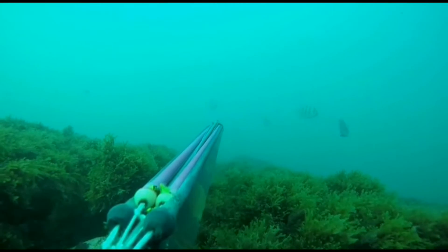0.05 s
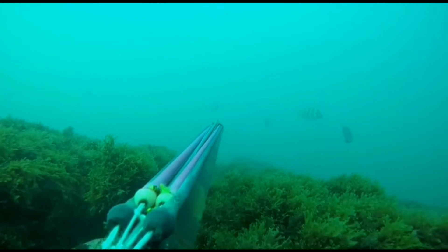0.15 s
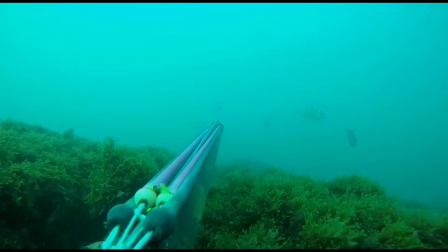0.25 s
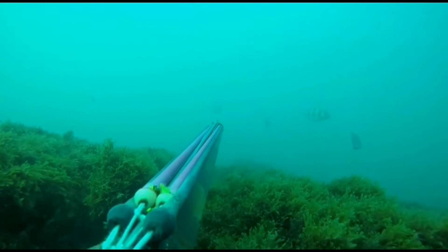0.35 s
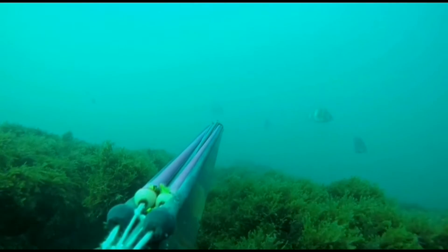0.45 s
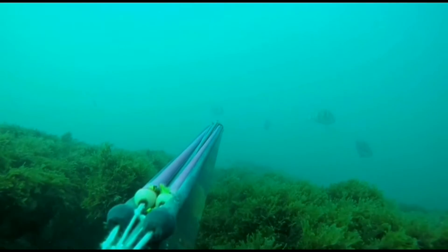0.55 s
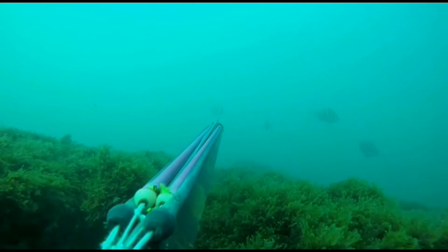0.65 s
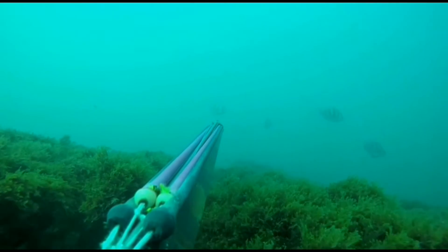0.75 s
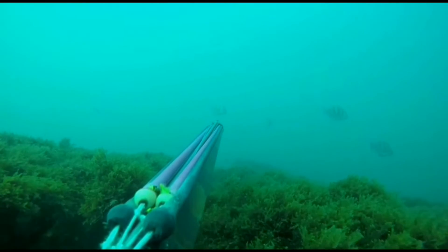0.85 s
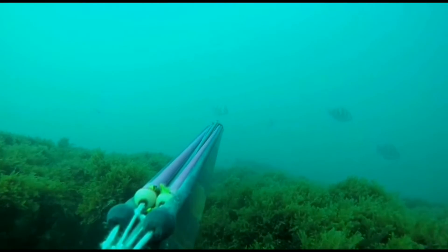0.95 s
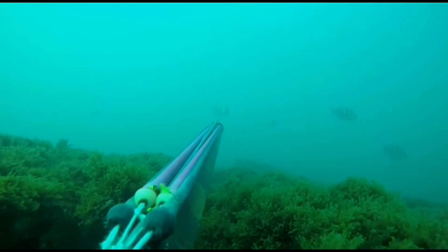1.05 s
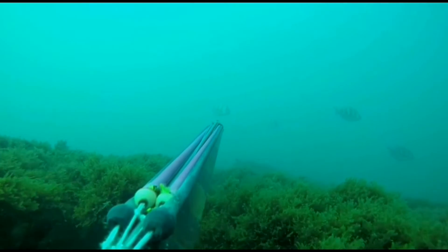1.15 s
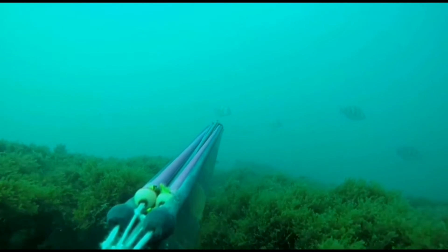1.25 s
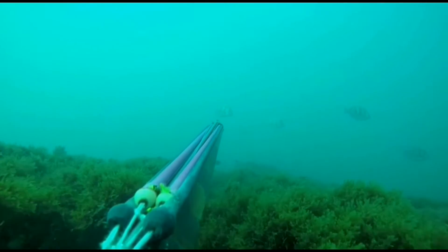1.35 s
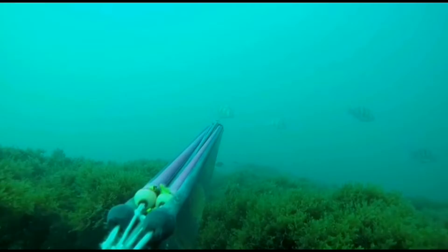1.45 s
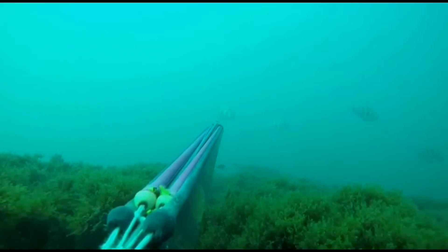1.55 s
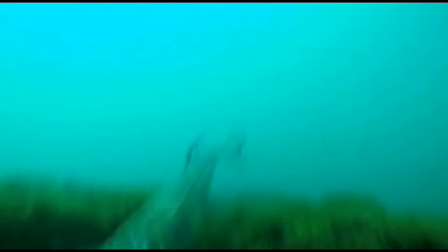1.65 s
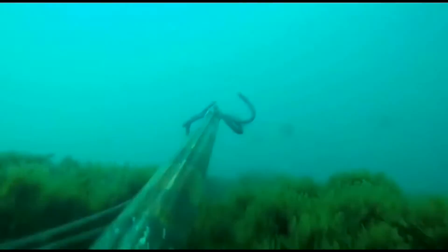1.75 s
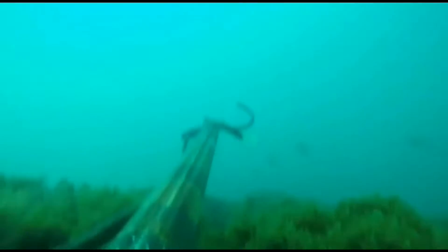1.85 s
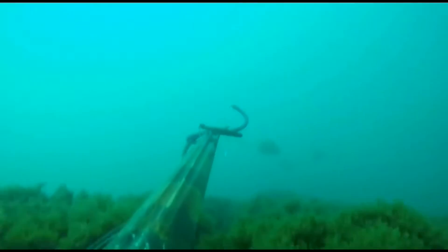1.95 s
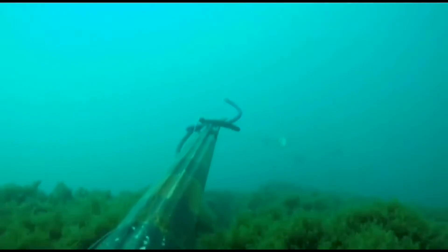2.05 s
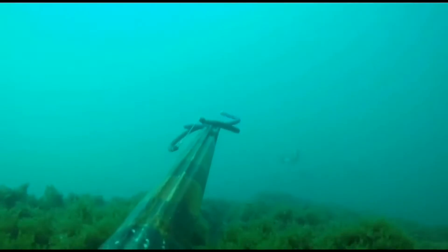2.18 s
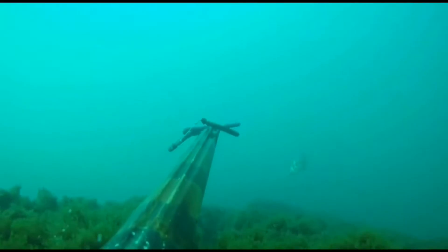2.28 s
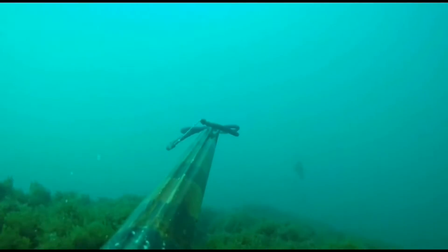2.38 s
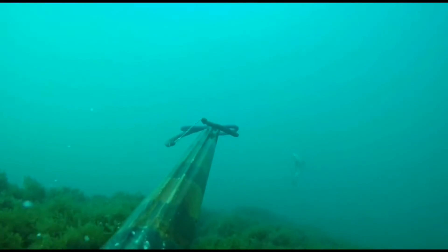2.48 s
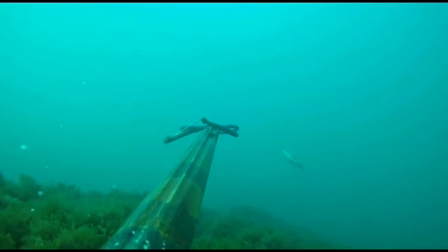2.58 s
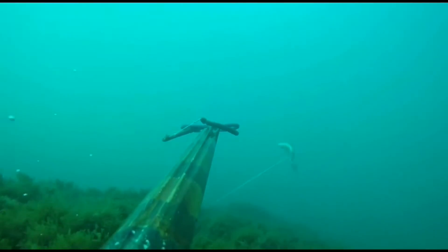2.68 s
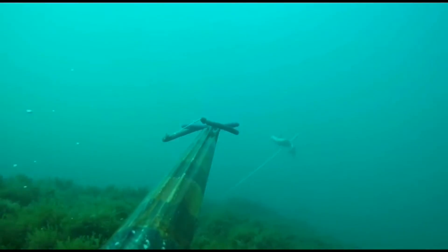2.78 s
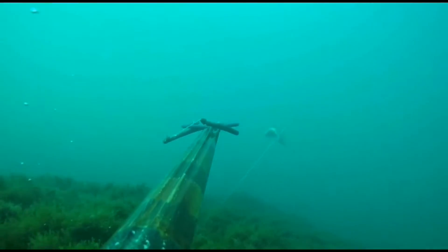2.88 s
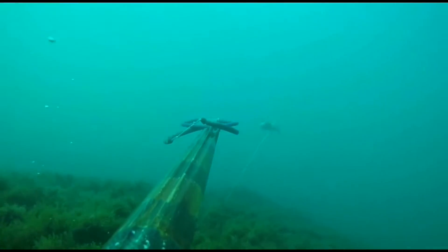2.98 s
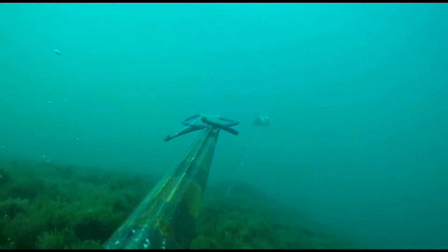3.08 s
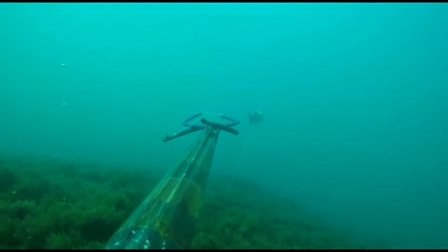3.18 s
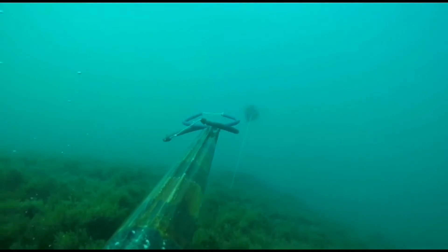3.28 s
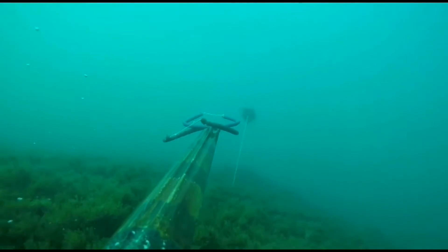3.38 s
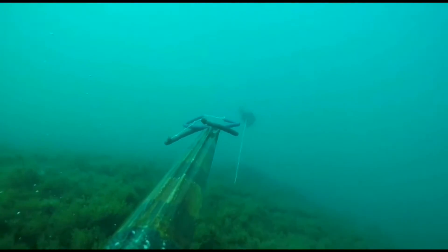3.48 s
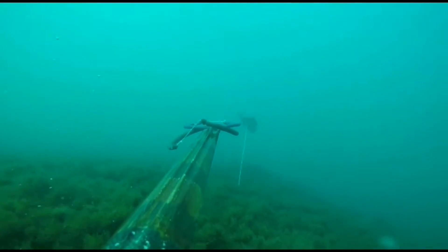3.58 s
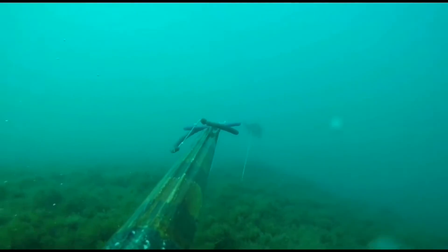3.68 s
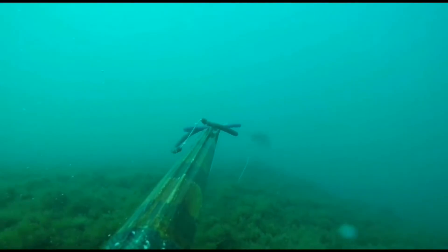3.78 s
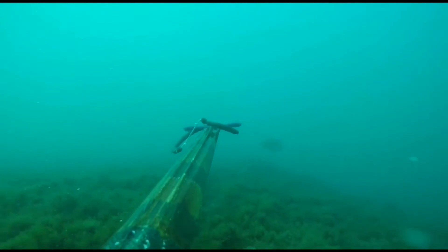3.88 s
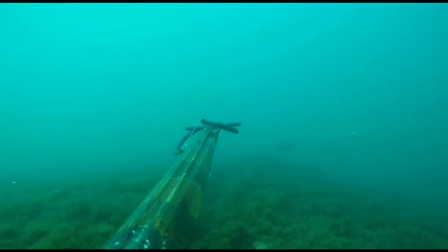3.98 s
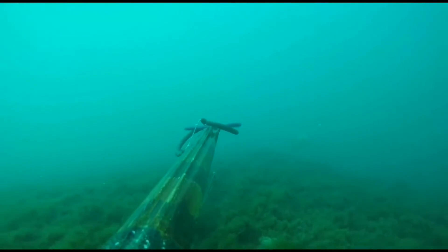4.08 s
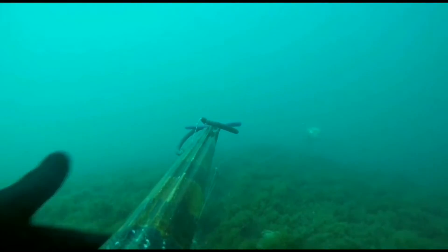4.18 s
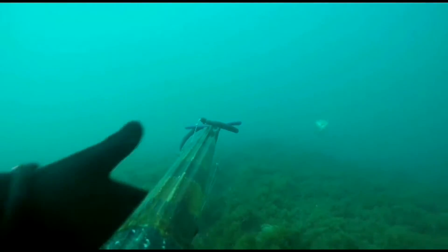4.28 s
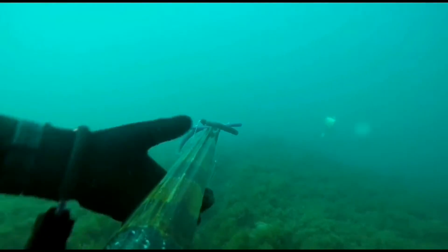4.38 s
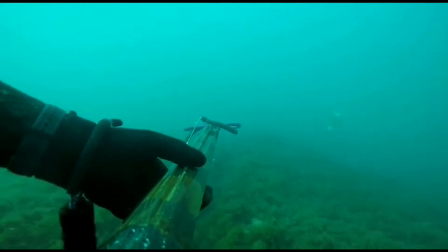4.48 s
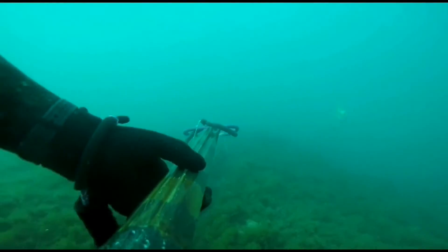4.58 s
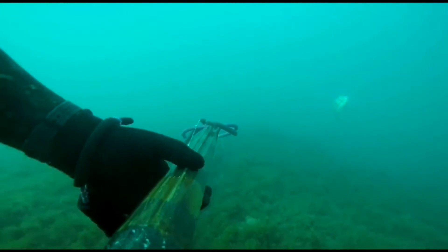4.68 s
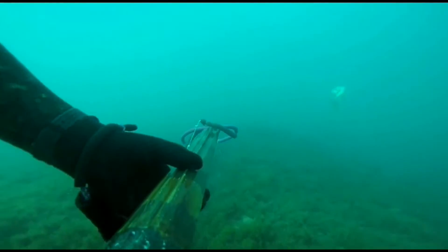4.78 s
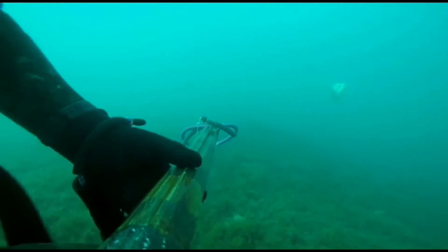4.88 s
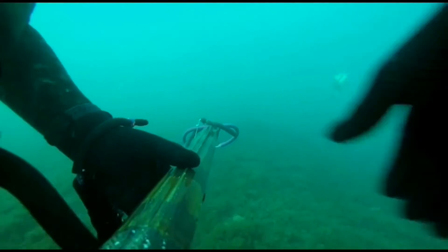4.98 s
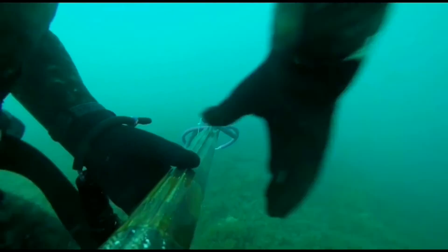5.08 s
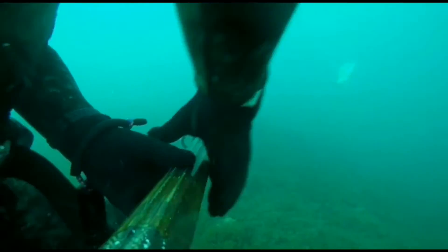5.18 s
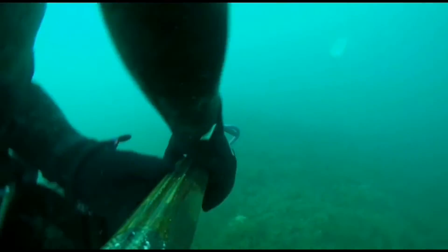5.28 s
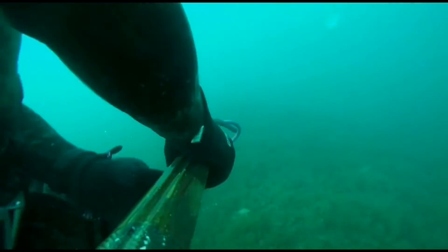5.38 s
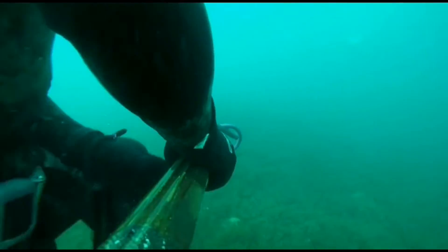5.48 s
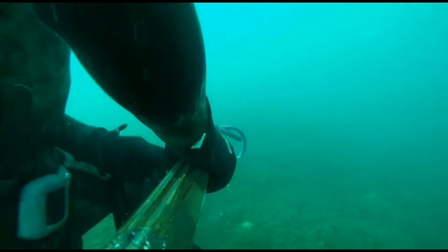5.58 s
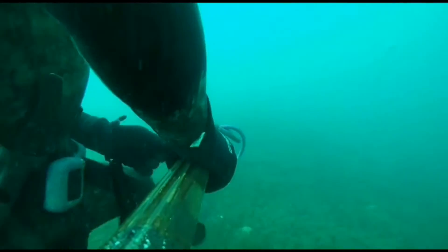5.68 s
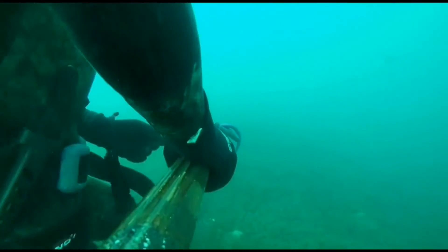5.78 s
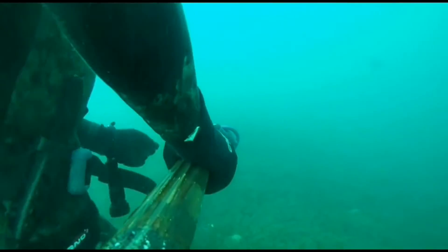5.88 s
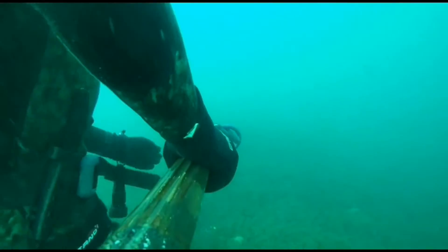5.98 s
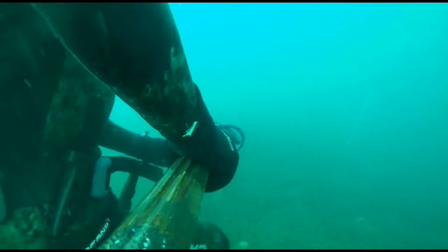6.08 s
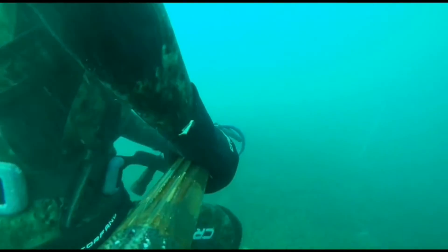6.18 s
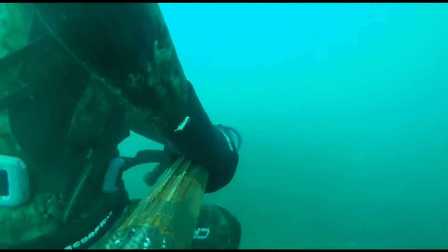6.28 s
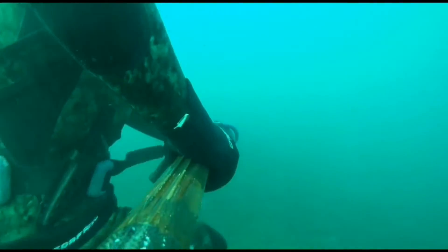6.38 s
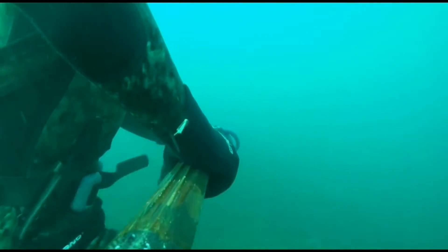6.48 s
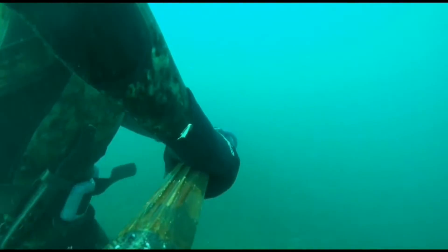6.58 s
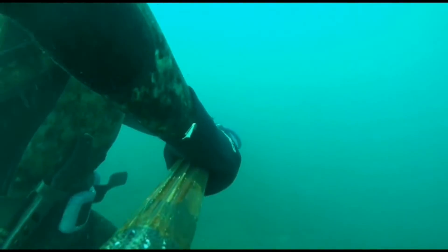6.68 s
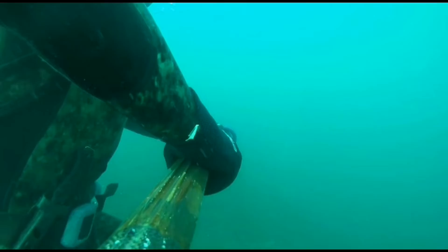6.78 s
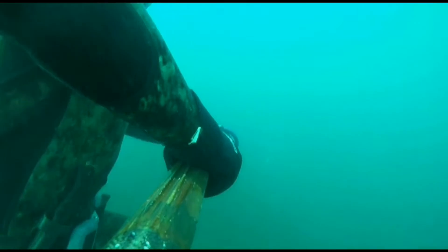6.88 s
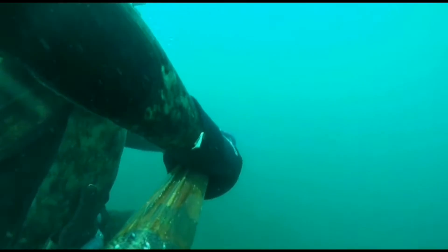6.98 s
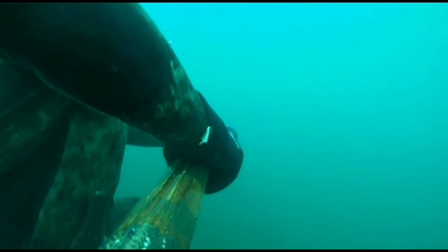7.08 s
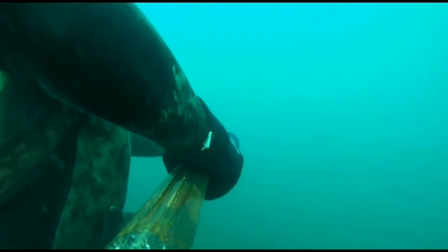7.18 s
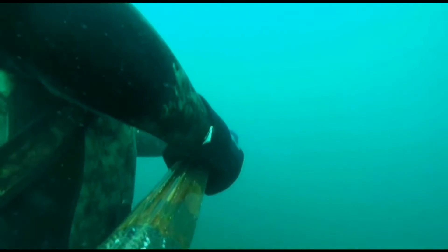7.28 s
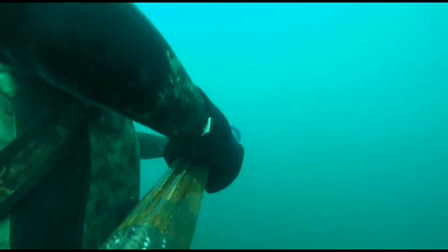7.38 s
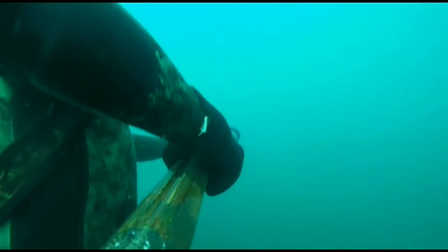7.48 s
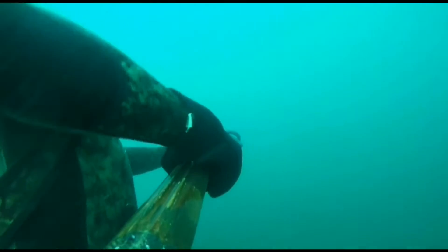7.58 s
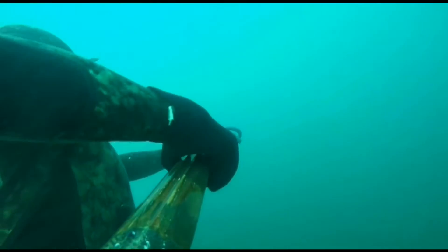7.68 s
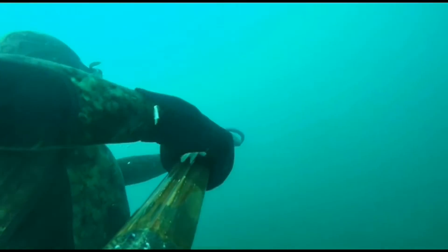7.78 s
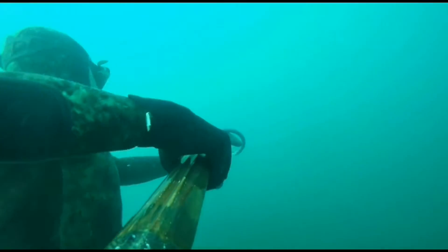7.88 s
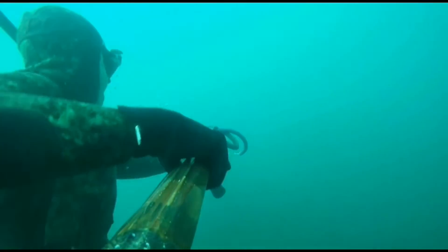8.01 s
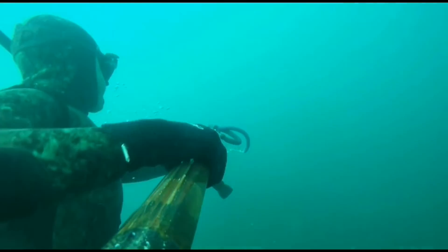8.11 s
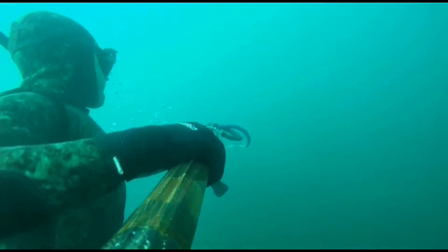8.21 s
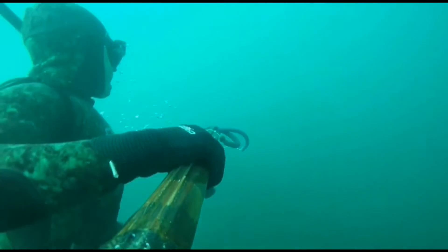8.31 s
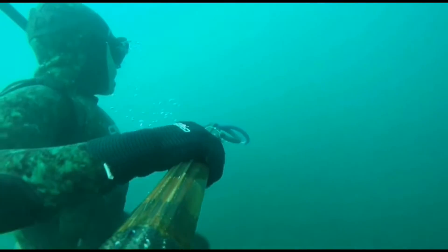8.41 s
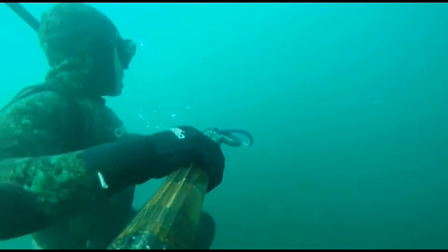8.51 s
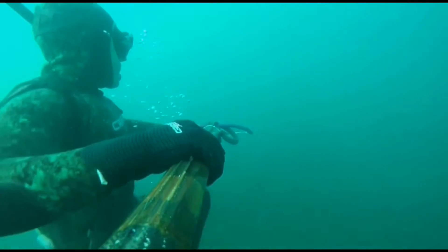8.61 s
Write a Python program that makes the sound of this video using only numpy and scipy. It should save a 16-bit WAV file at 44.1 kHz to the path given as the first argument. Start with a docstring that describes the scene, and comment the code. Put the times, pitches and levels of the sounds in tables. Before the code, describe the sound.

Fine shrimp snapping around a muffled underwater microphone, one violent clattering speargun shot, then deep rumbling water, dull wooden thumps and brief rubbery squeaks.

```python
"""Shrimp crackle all round a reef, heard by a microphone sealed in a housing on a speargun's wooden stock.
The gun fires: a tear of dense contacts and a swinging recoil overload the input and duck the gain.
Then the diver swims up: low noise buffets the housing, and gloves rub and knock the stock's ringing modes.
Hard taps are dying sines, a dragged glove is gritty contacts, and squeaks are tones bending in pitch."""
import sys
import numpy as np
from scipy import signal
from scipy.io import wavfile
from scipy.ndimage import uniform_filter1d, minimum_filter1d

SR = 44100
rng = np.random.default_rng(int(sys.argv[2]) if len(sys.argv) > 2 else 0)


def attenuation_scalar(level_db):
    """Turn a level in dB into a linear amplitude multiplier (20 dB per decade)."""
    decades = np.asarray(level_db, float) / 20
    return 10 ** decades


def file_out(sig):
    """Save sig as 16-bit WAV at sys.argv[1]."""
    # one column per channel
    cols = np.atleast_2d(sig).T
    # limit, then scale
    lim = np.clip(cols, -1, 1)
    pcm = np.round(lim * 32767).astype(np.int16)
    wavfile.write(sys.argv[1], SR, pcm)


N = 381465


def rms_one(x):
    """Scales a signal to an rms of 1."""
    return x / np.sqrt(np.mean(x ** 2) + 1e-20)


def evened(x, span_s):
    """Divides out level changes slower than the span."""
    return x / np.sqrt(uniform_filter1d(x * x, max(round(span_s * SR), 1)) + 1e-20)


def in_time(rows):
    """Draws each column as a line through its points in time."""
    s, *columns = np.transpose(rows)
    return [np.interp(np.arange(N) / SR, s, column) for column in columns]


def swells(rows, rise_db_per_s, fall_db_per_s):
    """Level in dB: each (t/s, hold/s, level/dB) rises, holds and falls; the loudest one leads."""
    t = np.arange(N) / SR
    out = np.full(N, -200.)
    for s, hold_s, db in rows:
        rise_db = rise_db_per_s * np.maximum(s - t, 0)
        fall_db = fall_db_per_s * np.maximum(t - s - hold_s, 0)
        out = np.maximum(out, db - rise_db - fall_db)
    return out


def cut(x, hz, kind, order=2):
    """Butterworth filter."""
    return signal.sosfilt(signal.butter(order, hz, kind, fs=SR, output="sos"), x + 1e-18)


def resonate(x, hz, width_hz):
    """One resonance with gain 1 on top."""
    r = np.exp(-np.pi * width_hz / SR)
    zeros = np.array([1, 0, -1]) * (1 - r * r) / 2
    poles = [1, -2 * r * np.cos(2 * np.pi * hz / SR), r * r]
    return signal.lfilter(zeros, poles, x + 1e-18)


def grains(per_s, spread_db):
    """Random clicks of either sign, a few much larger than the rest."""
    sizes = attenuation_scalar(spread_db * np.minimum(rng.exponential(1, N), 5)) * rng.choice([-1, 1], N)
    return sizes * (rng.random(N) < per_s / SR)


def clicks_at(seconds, sizes):
    """Single-sample clicks at given times."""
    out = np.zeros(N)
    np.add.at(out, np.round(np.asarray(seconds) * SR).astype(int), sizes)
    return out


# resonances of the housing's shell: [f/Hz, width/Hz, level/dB]
SHELL_MODES = [(640, 60, -25), (1400, 490, -11), (2128, 100, 0.5), (2553, 350, 0), (3710, 830, -4),
               (4244, 355, 2), (5420, 580, -1), (6860, 1600, -6), (8920, 1200, -7.5), (10720, 1300, -12),
               (13900, 1500, -17.5)]


def housing(x):
    """Sound in the water reaches the capsule through the shell's resonances, alternating in polarity."""
    return sum((-1) ** k * attenuation_scalar(db) * resonate(x, hz, width) for k, (hz, width, db) in enumerate(SHELL_MODES))


# near snaps, from shrimp and the odd hard touch on the housing: [t/s, relative level/dB, treble level/dB]
NEAR_SNAPS = [(0.0784, -26.5, -5), (0.135, -23, -3), (0.2142, -33, -4), (0.4924, -37, 4.5),
              (0.5117, -28.5, -5), (0.609, -33, -8), (0.846, -30, -2.5), (0.867, -33.5, 4.5),
              (0.9448, -31, -5), (1.0525, -34.5, -5), (1.156, -31.5, -8.5), (1.302, -32.5, -3),
              (1.4599, -30, -2), (1.516, -35, -5), (2.036, -40, -9), (2.287, -35.5, -4.5),
              (3.3118, -37, -8), (3.5297, -32, -8), (4.1643, -48, 16), (4.2506, -37, -32),
              (4.3435, -31, -38), (4.7819, -21, -6.5), (5.034, -30.5, -3), (5.077, -42, -13),
              (5.236, -50, 10), (5.1825, -36.5, 0.5), (5.3691, -33, -1), (5.676, -28, -33),
              (5.886, -31, -1.5), (6.2303, -27.5, -2), (6.2522, -20.5, -3.5), (6.358, -29.5, -1),
              (6.893, -26.5, -6), (6.976, -29, 1), (7.155, -28, -4), (7.2497, -29.5, -4), (7.4674, -29, -2),
              (7.945, -29, -2.5), (8.1681, -32, 0), (8.448, -55.5, 20)]
# snaps returning off rocks and bottom: [delay t/s, level/dB]
SNAP_ECHOES = [(.0045, -17), (.0065, -15.5), (0.01, -18)]


def reef():
    """Far shrimp blur to a hiss, nearer ones crackle in clumps, the nearest snap with a few echoes."""
    far = attenuation_scalar(-52.5) * rms_one(housing(rng.standard_normal(N)))

    clumps = attenuation_scalar(5.2 * rms_one(cut(rng.standard_normal(N), 15, "low")))
    # small claws click high, large ones reach down
    claw_bands_hz = ([900, 3500], [1800, 9000], [3500, 8000], [6000, 16000])
    claws = sum(cut(grains(140 * clumps, spread_db=4.2), band, "band") for band in claw_bands_hz)
    crackle = attenuation_scalar(-48.5) * rms_one(housing(claws))

    s, peak_db, treble_db = np.transpose(NEAR_SNAPS)
    low = cut(clicks_at(s, attenuation_scalar(peak_db)), 6060, "low")
    high = cut(clicks_at(s, attenuation_scalar(peak_db + treble_db)), 3840, "high")
    # the direct snap, a fading haze of scatter, and distinct echoes
    t = np.arange(SR // 30) / SR
    scatter = attenuation_scalar(-26 - 60 * t / .04) * rng.standard_normal(len(t))
    scatter[0] = 1
    for delay_s, db in SNAP_ECHOES:
        scatter[round(delay_s * SR)] = attenuation_scalar(db)
    snaps = signal.fftconvolve(housing(low + high), scatter)[:N]
    return far + crackle + attenuation_scalar(31.5) * snaps


# water past the housing as the diver lies still, then swims up: [t/s, surge level/dB, buffet level/dB]
WATER_FLOW = [(0.0, -45, -48.5), (0.5, -44, -44), (1.3, -43.5, -41), (1.75, -34.5, -44), (2.0, -24, -12),
              (2.45, -18.5, -34), (3.1, -50.5, -38), (3.5, -53, -33.5), (4.1, -47, -38), (4.45, -41, -40.5),
              (4.9, -28.5, -34), (5.4, -36.5, -29.5), (5.8, -24.5, -35), (6.4, -27.5, -26.5),
              (6.7, -18, -24.5), (7.6, -13.5, -30.5), (8.05, -24, -26.5), (8.65, -23, -28)]
# the gun lurches through the water and the buffet swells: [t/s, level/dB]
GUN_LURCHES = [(3.679, -26.5), (4.605, -14.5), (4.86, -18), (5.249, -23.5), (5.549, -11), (5.829, -18),
               (6.13, -21.5), (6.47, -17), (6.739, -17.5), (6.91, -17), (7.81, -18.5), (8.24, -17),
               (8.42, -13)]


def flow():
    """Eddies push the housing: a slow surge and a faster buffet near the mount's own swing."""
    surge_db, buffet_db = in_time(WATER_FLOW)
    lurches = swells([(s, 0, db) for s, db in GUN_LURCHES], rise_db_per_s=191, fall_db_per_s=133)
    lurch_db = np.maximum(buffet_db, lurches)

    surge = resonate(cut(rng.standard_normal(N), 27, "low"), 17, 1.2)
    buffet = cut(cut(rng.standard_normal(N), 50, "low", order=7), 26, "high")
    # smaller eddies sit above the buffet in pitch
    small = cut(cut(rng.standard_normal(N), 87, "low"), 42, "high")
    eddies = attenuation_scalar(-17.5) * rms_one(small)
    return attenuation_scalar(surge_db) * evened(surge, 0.086) + attenuation_scalar(lurch_db) * evened(buffet, .09) + attenuation_scalar(buffet_db) * eddies


# gloves and line working on the stock: [t/s, bending level/dB, rubbing level/dB]
GLOVE_HANDLING = [(0.0, -85, -78), (1.6, -85, -82), (1.9, -44, -66.5), (2.1, -56, -61), (2.9, -55.5, -68),
                  (3.2, -48, -58), (3.9, -53.5, -68.5), (4.3, -54, -67.5), (4.6, -45, -54.5),
                  (5.2, -53, -63), (5.65, -42, -49), (6.1, -50, -57.5), (6.45, -53, -44.5), (6.8, -55, -48),
                  (7.2, -40.5, -50.5), (7.9, -47, -53), (8.3, -53, -52.5), (8.65, -60, -58.5)]
# a glove slips briefly on the wood: [t/s, hold/s, level/dB]
GLOVE_RUBS = [(5.63, 0.0034, -40.5), (6.5, 0.0095, -38), (6.65, 0.03, -42.5), (6.72, 0.005, -37.5),
              (6.775, 0.0073, -42)]
# the stock flexes and its low modes groan: [t/s, hold/s, level/dB]
STOCK_FLEXES = [(3.67, 0.018, -47.5), (4.02, 0.092, -51), (5.32, 0.34, -44.5), (5.75, 0.055, -37),
                (6.2, 0.016, -33), (6.58, 0.047, -35.5), (6.71, 0.045, -33), (6.86, 0.014, -33),
                (8.0, 0.047, -29), (8.19, 0.033, -25.5), (8.41, 0.014, -34)]
# knocks on the stock: [t/s, relative level/dB, hardness level/dB, favoured f/Hz]
STOCK_KNOCKS = [(0.786, -19, -9.5, 500), (1.723, -25.5, 2.5, 633), (1.744, -13.5, -14, 630),
                (1.815, 15, -25.5, 240), (1.895, -6, -20, 183), (2.368, -14.5, -26.5, 377),
                (2.43, -25.5, 3, 666), (3.072, -12.5, -36, 485), (3.105, -11.5, -32, 410),
                (3.121, -15.5, -23, 520), (3.256, -34.5, 2, 590), (3.305, -22, -13, 135),
                (3.359, -29.5, -1.5, 620), (3.671, -26.5, -5.5, 200), (3.794, -23, -6, 410),
                (3.929, -24, -0.5, 612), (4.005, -19.5, -9, 364), (4.099, -23, -31, 248),
                (4.431, -24, -21, 640), (4.552, -29.5, 4, 716), (5.036, -19, -16, 738),
                (5.292, -24.5, -28, 626), (5.741, -6.5, -26, 240), (5.767, -11.5, -21, 232),
                (5.826, -23, -22, 640), (5.872, -18.5, -25, 640), (6.208, -11, -25, 220),
                (6.298, -12, -34, 333), (6.445, -11, -11.5, 340), (7.802, -12, -20, 420),
                (8.183, -10, -35, 382), (8.23, -18, -7, 640), (8.279, -23, -5.5, 368),
                (8.449, -21, -10, 514)]
# modes of the wooden stock: [f/Hz, nominal width/Hz, level/dB when rubbed]
STOCK_MODES = [(101, 16, -0.5), (142, 31, -9.5), (183, 18, -1.5), (227.4, 43, -19.5), (331, 60, 2.5),
               (630, 59.6, 8.5), (766, 95, -3.5), (500, 110, -1), (1124, 96, -9), (1557, 190, -11)]


def stock():
    """Rubbing grains and knocks ring the same wooden modes; low modes follow bending, high ones rubbing."""
    bend_db, rub_db = in_time(GLOVE_HANDLING)
    rub_db = np.maximum(rub_db, swells(GLOVE_RUBS, rise_db_per_s=546, fall_db_per_s=462))
    flex_db = np.maximum(bend_db, swells(STOCK_FLEXES, rise_db_per_s=273, fall_db_per_s=231))
    grip = attenuation_scalar(3.2 * rms_one(cut(rng.standard_normal(N), 9, "low")))

    # every knock is a contact of its own: one firm touch and a gritty slide after it
    s, peak_db, hardness_db, spot_hz = np.transpose(STOCK_KNOCKS)
    t = np.arange(SR // 20) / SR
    during = np.round(s * SR).astype(int)[:, None] + np.arange(len(t))
    contacts = attenuation_scalar(-4 - 60 * t / 0.028) * rng.standard_normal(during.shape)
    contacts[:, 0] = attenuation_scalar(21.5)
    scatter_db = rng.normal(0, 2, (len(s), len(STOCK_MODES)))

    out = np.zeros(N)
    for k, (hz, width, db) in enumerate(STOCK_MODES):
        # soft rubber: the mode stands clear of its skirts
        rubbed = resonate(grip * grains(1200.0, spread_db=3.5), hz, width)
        rubbed = resonate(rubbed, hz, 3.0 * width)
        drive_db = bend_db if hz < 160 else flex_db if hz < 260 else rub_db
        out += attenuation_scalar(db + drive_db) * rms_one(rubbed)

        # where the blow lands favours the nearest low mode; its hardness sets the high ones
        reach_db = hardness_db if hz > 900 else -12 * np.abs(np.log2(hz / spot_hz))  # dB per octave away
        blows = np.zeros(N)
        np.add.at(blows, during, attenuation_scalar(peak_db + reach_db + scatter_db[:, k])[:, None] * contacts)
        rung = resonate(resonate(blows, hz, 0.94 * width), hz, 4.5 * width)
        # narrow modes gather a short blow less: made up by their width
        out += attenuation_scalar(50.0) / width * cut(rung, 1.2 * hz, "low", order=3)
    return out


def tap(start_s, level_db, hz, t60):
    """A ring that swells over a cycle or two and buzzes as the parts chatter."""
    out = np.zeros(N)
    t = np.arange(round(2 * t60 * SR)) / SR
    chatter = 1 + .35 * rms_one(cut(rng.standard_normal(len(t)), hz / 3, "low"))
    swell = (1 - np.exp(-t * hz)) ** 2
    i = round(start_s * SR)
    out[i:i + len(t)] = attenuation_scalar(level_db - 60 * t / t60) * swell * chatter * np.sin(2 * np.pi * hz * t)
    return out


# hard taps ringing one part of the rig: [t/s, level/dB, f/Hz, t60/s]
HARD_TAPS = [(0.7855, -20, 2500, .009), (0.786, -27, 1600, .025), (3.592, -38, 3100, .012),
             (1.848, -18, 7800, .006), (1.864, -18, 8600, .006), (1.782, 8, 680, .05),
             (1.805, -6, 2000, .02), (1.824, -3, 690, .1), (1.864, -9, 640, .12), (2.092, -38, 5200, .02),
             (1.9, -17, 4200, .02), (1.9195, -15, 4100, .015), (4.7685, 8, 2150, 0.007),
             (4.769, -2, 1600, 0.014), (4.7688, -8, 2950, 0.02), (4.7862, -3, 4770, 0.009),
             (4.786, -11, 2500, 0.011)]


def taps():
    """Each hard touch rings a single part, kept clear of the lows."""
    return cut(sum(tap(*row) for row in HARD_TAPS), 400, "high")


# broad resonances of the spear track: [f/Hz, width/Hz, level/dB]
TRACK_MODES = [(640, 140, -0.5), (1450, 530, 2), (2010, 440, 4), (2900, 250, 0), (4400, 800, 0.5),
               (6500, 870, -15), (11300, 5500, -27.5)]


def track(per_s, spread_db):
    """Dense contacts ring the broad resonances of the spear track, each with its own grains."""
    modes = [attenuation_scalar(db) * rms_one(resonate(grains(per_s, spread_db), hz, width)) for hz, width, db in TRACK_MODES]
    return rms_one(sum(modes))


def ring(start_s, level_db, hz, t60):
    """A dying sine."""
    t = np.maximum(np.arange(N) / SR - start_s, 0)
    return attenuation_scalar(level_db - 60 * t / t60) * np.sin(2 * np.pi * hz * t)


# trigger, release, bands and line tearing along the track in bursts: [t/s, hold/s, level/dB]
SHOT_BURSTS = [(1.744, .004, -29.5), (1.758, .01, -45), (1.779, 0.005, 5), (1.792, 0.0011, -14),
               (1.8, 0.0091, -10), (1.811, 0.0026, -1.5), (1.818, 0.01, -3), (1.83, 0.026, -24),
               (1.876, 0.016, -17), (1.899, 0.00094, -21), (1.92, 0.008, -16.5), (1.932, 0.0018, -23.5),
               (1.988, 0.0037, -30)]
# swings of the gun and its barrel: [direction, t/s, level/dB, f/Hz, t60/s]
RECOIL_SWINGS = [(-1, 1.788, 18, 40, .06), (1, 1.811, 11, 16, .3), (-1, 1.8272, 9, 157, .11),
                 (-1, 1.84, 2, 60, .3)]


def shot():
    """A rattling tear of dense contacts that also shakes the stock, and the recoil swinging the gun back."""
    rise_db_per_s = 12000
    strength = attenuation_scalar(swells(SHOT_BURSTS, rise_db_per_s, fall_db_per_s=4000))
    tear = strength * track(4000.0, spread_db=6.0)
    # only the spear itself tears brightly; once it is gone the bands slap dull
    spear_s, release_s = SHOT_BURSTS[2][0], SHOT_BURSTS[1][0]
    sheen = attenuation_scalar(swells([(spear_s, 0, 0)], rise_db_per_s, fall_db_per_s=196.5))
    tear = sheen * tear + (1 - sheen) * cut(tear, 5460, "low")

    # the slack bands keep shaking the stock's low modes, dying by 60 dB in 0.99 s
    rattle = attenuation_scalar(swells([(release_s, 0, -21.5)], rise_db_per_s, fall_db_per_s=60 / 0.99))
    jolts = (strength + rattle) * rms_one(grains(700, spread_db=4))
    shaken = sum(resonate(jolts, hz, 0.57 * width) for hz, width, db in STOCK_MODES if hz < 700)

    recoil = sum(way * ring(*swing) for way, *swing in RECOIL_SWINGS)
    return tear + attenuation_scalar(12.5) * shaken + recoil


# a glove dragging along the track: [t/s, level/dB before dulling]
GLOVE_SCRAPE = [(4.5, -84), (4.58, -45), (4.62, -50), (4.66, -36), (4.75, -39.5), (4.84, -45), (4.9, -97)]


def scrape():
    """Slow, gritty contacts, dulled by the glove."""
    return attenuation_scalar(in_time(GLOVE_SCRAPE)[0]) * cut(track(500.0, spread_db=1.5), 1300, "low")


# wet rubber squeaks: [t/s, length/s, start f/Hz, middle f/Hz, end f/Hz, level/dB]
RUBBER_SQUEAKS = [(5.067, 0.0055, 2820, 2900, 3060, -31), (5.229, 0.0089, 5000, 4400, 4670, -29),
                  (5.27, 0.013, 2960, 2410, 2220, -27.5), (5.299, 0.025, 2960, 2460, 3480, -31.5),
                  (5.331, 0.0183, 2633, 2760, 3300, -30.5)]


def squeaks():
    """Stick-slip tones that bend in pitch, with an uneven grip."""
    out = np.zeros(N)
    for s, length_s, start_hz, mid_hz, end_hz, db in RUBBER_SQUEAKS:
        u = np.linspace(0, 1, round(length_s * SR))
        hz = np.interp(u, [0, .5, 1], [start_hz, mid_hz, end_hz])
        hz = hz * (1 + .02 * rms_one(cut(rng.standard_normal(len(u)), 500, "low")))
        grip = 1 + .6 * rms_one(cut(rng.standard_normal(len(u)), 500, "low"))
        envelope = np.sin(np.pi * u ** 0.34) ** 0.39
        i = round(s * SR)
        out[i:i + len(u)] += attenuation_scalar(db) * envelope * grip * np.sin(2 * np.pi * np.cumsum(hz) / SR)
    return out


def scene():
    """Reef, water, handling and the shot, summed to one channel."""
    return (reef() + flow() + stock() + taps() + shot() + scrape() + squeaks())[None]


def band_limit(x):
    """A steep low-pass at the top of the band."""
    return signal.sosfilt(signal.butter(12, 16550, fs=SR, output="sos"), x)


def record(dry):
    """Gain control pulls loud sound down, holds, and creeps back; what it misses saturates."""
    duck_above_db, duck_slope = -10.5, 1.187  # slope: dB taken off per dB over
    hold_s, release_db_per_s, glide_s = 0.32, 19, .035
    t = np.arange(N) / SR
    power = np.abs(cut(dry[0] ** 2, 8, "low", order=1))
    level_db = 10 * np.log10(power + 1e-12)
    over_db = duck_slope * np.maximum(level_db - duck_above_db, 0)

    # the deepest duck of the past hold time stands, then lets go at a steady rate
    hold = round(hold_s * SR)
    held_db = -minimum_filter1d(-over_db, hold, origin=(hold - 1) // 2)
    released_db = np.maximum.accumulate(held_db + release_db_per_s * t) - release_db_per_s * t
    r = np.exp(-1 / (glide_s * SR))
    gain = attenuation_scalar(-signal.lfilter([1 - r], [1, -r], released_db))

    saturated = np.tanh(dry * gain)
    return band_limit(cut(saturated, 15000, "low", order=5))


dry = scene()
out = record(dry)
file_out(out)
```